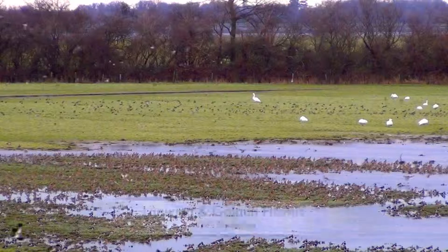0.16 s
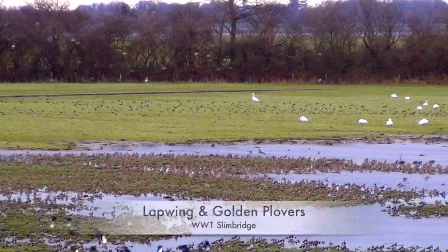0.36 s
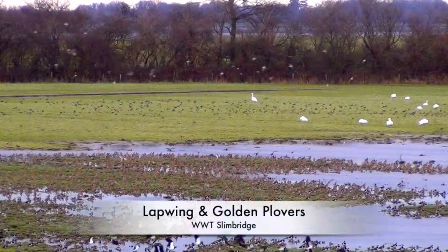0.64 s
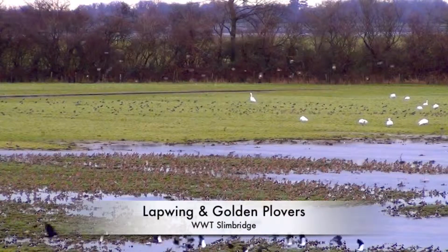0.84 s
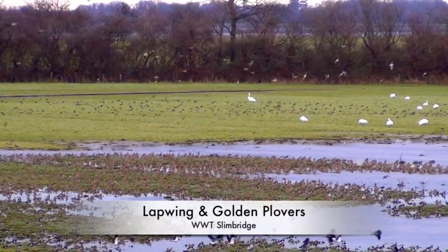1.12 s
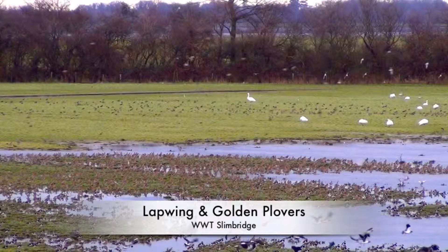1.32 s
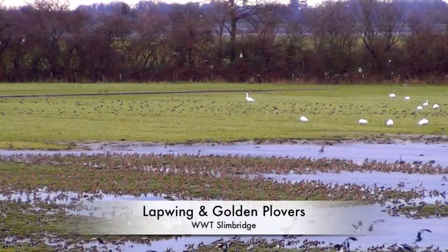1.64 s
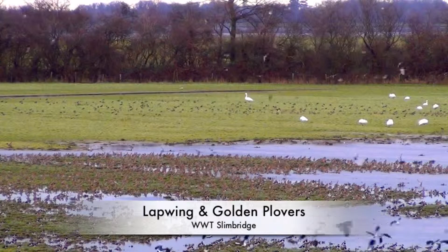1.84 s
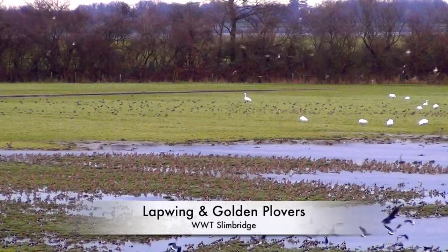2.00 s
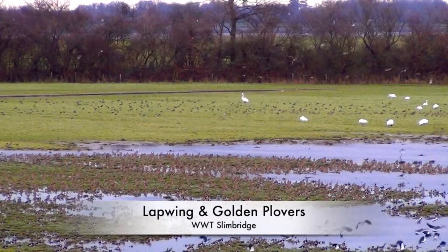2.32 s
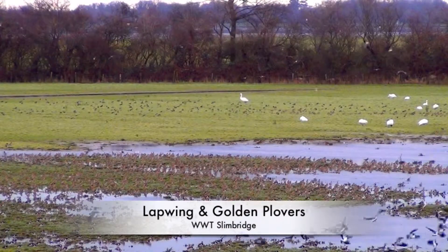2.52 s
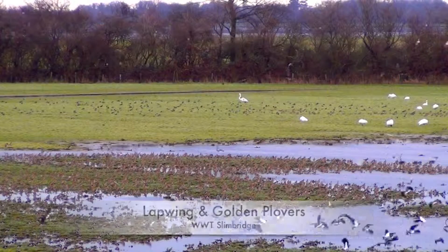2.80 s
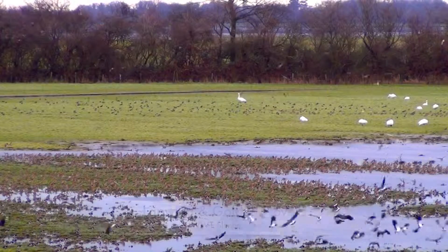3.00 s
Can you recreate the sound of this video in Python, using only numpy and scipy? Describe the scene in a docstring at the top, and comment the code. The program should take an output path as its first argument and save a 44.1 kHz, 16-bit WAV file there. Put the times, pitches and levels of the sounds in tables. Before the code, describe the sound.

Short arched waterbird yelps come at about 0.4, 0.9, 1.3, 1.5, 1.8 and 2.8 seconds, the fifth lower-pitched, the last strongest. The wetland background fades in quickly with hiss, faint hum, thin whine and rumble, while far birds whistle downward throughout. A faint scuff precedes the first yelp; soft bumps and thin distant mews follow from 0.5. A dull knock sounds near 2.3, then two weak bumps.

```python
"""An open wetland fades in together with its camera hiss, faint hum, thin high whine and low rumble.
Far birds whistle sagging sine notes throughout; a faint scuff (filtered noise) precedes the first yelp.
A waterbird gives six arched yelps, built from harmonics shaped by throat resonances.
During the first second soft bumps (brief low pulses) and two far mews (upper harmonics) join in.
Later a dull knock excites a set of damped modes, and two more bumps follow."""
import sys
import numpy as np
from scipy import signal
from scipy.fft import rfft, irfft, next_fast_len
from scipy.io import wavfile
from scipy.ndimage import uniform_filter1d, map_coordinates

SR = 44100
rng = np.random.default_rng(int(sys.argv[2]) if len(sys.argv) > 2 else 0)


def pcm_store(signal):
    """Save signal as 16-bit PCM."""
    levels = np.round(np.clip(np.atleast_2d(signal), -1, 1) * 32767)
    wavfile.write(sys.argv[1], SR, levels.astype(np.int16).T)


N = 138915
T = np.arange(N) / SR  # time in seconds


def amp(db):
    """Decibels to amplitude ratio: 20 dB is a factor of ten."""
    return 10 ** (np.asarray(db) / 20)


def unit(x):
    """Normalise to a root-mean-square of 1."""
    return x / np.sqrt(np.mean(x ** 2) + 1e-20)


def along(points, hz):
    """Interpolate (frequency, value) points linearly over log frequency."""
    f, v = np.transpose(points)
    return np.interp(np.log(hz + 1), np.log(f + 1), v)


def wobble(rate):
    """Smooth random modulation: a spline through random knots, rate knots a second."""
    return map_coordinates(rng.standard_normal(4096), [T * rate], mode="wrap")


def filtered(x, response):
    """Linear filtering: multiply the zero-padded spectrum by a response of frequency."""
    m = next_fast_len(N + SR // 4)
    hz = np.fft.rfftfreq(m, 1 / SR)
    return irfft(rfft(x, m) * response(hz), m)[..., :N]


def noise(spectrum):
    """Coloured noise: white noise shaped by a spectral envelope, rms 1."""
    white = rng.standard_normal(N)
    return unit(filtered(white, lambda hz: amp(along(spectrum, hz))))


def rush(spectrum, patchy_db):
    """Partly coherent stereo noise, rms 1, its gain patchy over time and frequency."""
    # Interaural coherence. Each row: frequency in Hz, likeness of left and right from 0 to 1.
    likeness = [(30, 1), (130, 1), (290, 1), (640, 0.9), (1410, 0.59), (3100, 1), (6800, 0.75), (15000, 1)]
    z = signal.stft(rng.standard_normal((2, N)), nperseg=512)[2]
    patches = uniform_filter1d(rng.standard_normal(z.shape[1:]), size=3, axis=0)
    patches = unit(uniform_filter1d(patches, size=12, axis=1))
    pair = signal.istft(z * amp(patchy_db * patches), nperseg=512)[1][:, :N]

    def mid_side_response(hz):
        # cos and sin of half this angle give mid and side noise the wanted coherence
        half_angle = np.arccos(np.clip(along(likeness, hz), -1, 1)) / 2
        return amp(along(spectrum, hz)) * [np.cos(half_angle), np.sin(half_angle)]

    mid, side = filtered(pair, mid_side_response)
    return unit(np.array([mid + side, mid - side]))


def tone(hz):
    """Frequency modulation: a sine of rms 1 whose phase is the running sum of its pitch."""
    return np.sqrt(2) * np.sin(2 * np.pi * np.cumsum(hz) / SR)


def swell(u):
    """Rounded envelope: root of a half sine as u goes from 0 to 1."""
    return np.sqrt(np.abs(np.sin(np.pi * u)))


def camera():
    """Broadband hiss, wavering hum tones and a whine whose amplitude modulation adds buzzing sidebands."""
    # Hiss common to both ears. Each row: frequency in Hz, relative density in dB per Hz.
    hiss_spectrum = [(100, 6), (3000, -16.5), (8000, 0.5), (15500, 2)]
    # Hiss in opposite phase at the two ears. Each row: frequency in Hz, relative density in dB per Hz.
    side_spectrum = [(100, 3), (4500, 2.5), (7000, -7.5), (9500, -19), (15000, -49)]
    # Hum tones. Each row: centre pitch in Hz, level in dB.
    hum_tones = [(205, -69.5), (640, -73.5), (883, -78.5)]
    hiss_db, side_db, whine_db = -63, -70.5, -77.5
    whine_hz, buzz_hz = 15625, 49
    buzz_db, buzz_slope_db = -8, 2  # first sideband relative to the whine; rise per buzz harmonic

    hum = sum(amp(db) * tone(hz + 4 * wobble(20)) for hz, db in hum_tones)
    buzz = sum(2 * amp(buzz_db + buzz_slope_db * k) * np.cos(2 * np.pi * (k + 1) * buzz_hz * T)
               for k in range(3))
    whine = amp(whine_db) * (1 + buzz) * tone(np.full(N, whine_hz))
    hiss = amp(hiss_db) * noise(hiss_spectrum)
    hiss = hiss + amp(side_db) * noise(side_spectrum) * [[1], [-1]]
    return hiss + hum + whine


def air():
    """Slowly modulated low noise for the rumble; coloured noise for the far flock's blurred murmur."""
    # Course of the rumble, used relative to its median. Each row: time in seconds, level in dB.
    rumble_course = [(.2, -56), (.5, -46), (.7, -51.5), (1, -53.5), (1.4, -58), (1.8, -57), (2.1, -55.5),
                     (2.38, -54), (2.65, -53), (2.85, -55.5), (3.15, -58.5)]
    # Rumble spectrum. Each row: frequency in Hz, relative density in dB per Hz.
    rumble_spectrum = [(12, -29), (24, -5), (43, 1.5), (85, -2), (150, -2), (290, -8), (400, -17.5),
                       (650, -20.5), (1100, -55)]
    # Far flock and air. Each row: frequency in Hz, relative density in dB per Hz.
    field_spectrum = [(150, -6), (350, -0.5), (650, -3), (1050, -5), (1350, -3), (1700, -8), (2150, -5.5),
                      (2500, -10.5), (2900, -16), (4500, -17.5), (7000, -21), (15000, -56)]
    rumble_db, rumble_follows = -55, 0.75  # level at the median; share of the course that is followed
    field_db, fade_db_per_s = -56.5, 0.5  # level at mid-scene; steady decline

    course_db = np.interp(T, *np.transpose(rumble_course))
    rumble_gain = amp(rumble_db + rumble_follows * (course_db - np.median(course_db)))
    rumble = rumble_gain * rush(rumble_spectrum, patchy_db=1.5)
    field_gain = amp(field_db - fade_db_per_s * (T - T.mean()) + 1.3 * wobble(5.1))
    return rumble + field_gain * rush(field_spectrum, patchy_db=1.97)


def whistles(count=36):
    """Near-pure tones gliding down: single far birds, and a flock of fainter notes at random."""
    # Single whistles. Each row: start in seconds, length in seconds, starting pitch in Hz, level in dB.
    single = [(0.141, .18, 2474, -62.5), (.55, 0.15, 2490, -66), (0.679, .14, 2090, -63.5),
              (0.745, 0.096, 2405, -65), (0.877, 0.048, 1270, -62.5), (0.967, .09, 2086, -65),
              (1.42, 0.19, 2520, -67), (1.455, 0.048, 1342, -61), (2.17, 0.087, 2187, -67),
              (2.284, 0.12, 2580, -69), (2.74, 0.2, 2600, -67)]
    sag_per_s, jitter_scale = 0.27, 0.0049  # fractions of the starting pitch
    flock_hz, flock_spread = 2300, 0.09  # centre pitch; largest fractional departure
    flock_length_s, flock_db = 0.11, -70  # mean length; level

    out = np.zeros(N)
    jitter, flutter_db = jitter_scale * wobble(250), 1.6 * wobble(60)
    flock = []
    for k, (a, b, c) in enumerate(rng.random((count, 3))):
        start = T[-1] * (k + a) / count  # one note in each equal slot of time
        pitch = flock_hz * (1 + flock_spread * (2 * c - 1))
        flock.append((start, flock_length_s * (0.5 + b), pitch, flock_db))
    for s, length, hz, db in list(single) + flock:
        at = (T > s) & (T < s + length)
        t = T[at] - s
        note = tone(hz * (1 - sag_per_s * t + jitter[at]))
        out[at] += amp(db + flutter_db[at]) * swell(t / length) * note
    return out


def knocks():
    """Modal excitation: an impulse, decaying noise through damped resonances, and a noise scuff."""
    # Strokes: a faint scuff, then a dull knock.
    # Each row: time in seconds, body level in dB, scuff level in dB.
    strokes = [(0.238, -68, -58), (2.257, -44.5, -62)]
    # Body modes. Each row: centre in Hz, bandwidth in Hz, relative level in dB.
    modes = [(415, 80, -4), (540, 60, 0), (613, 34, 4.5), (883, 76, -4.5), (1310, 79, -5), (1770, 130, -12),
             (2400, 810, -16)]
    # Scuff spectrum. Each row: frequency in Hz, relative density in dB per Hz.
    scuff_spectrum = [(800, -3), (2600, 4), (5500, -10), (13000, -15)]
    ring_t60, scuff_t60, attack_s = 0.31, 0.21, 0.00095  # seconds to decay by 60 dB; onset time constant
    blow_db = 2.5  # peak of the first contact above the body level

    def body(f):
        # neighbouring modes alternate in sign
        return sum((-1) ** k * amp(db) * 1j * f * w / (c * c - f * f + 1j * f * w)
                   for k, (c, w, db) in enumerate(modes))

    ring = unit(filtered(rng.standard_normal(N), body))
    scuff = unit(noise(scuff_spectrum) * amp(4.9 * wobble(350)))
    out = np.zeros(N)
    for s, body_db, scuff_db in strokes:
        t = np.maximum(T - s, 0)
        impulse = 1.0 * (np.arange(N) == round(s * SR))
        blow = filtered(impulse, body)
        out += amp(body_db + blow_db) * blow / np.abs(blow).max()
        decaying = ring * amp(body_db - 60 * t / ring_t60) + scuff * amp(scuff_db - 60 * t / scuff_t60)
        out += (1 - np.exp(-t / attack_s)) * decaying
    return out


def yelps():
    """Source and filter: arched harmonics sweep through throat resonances, with an upward register break."""
    # Yelps. Each row: time of the top in seconds, top pitch in Hz, rise in seconds, fall in seconds,
    # onset of full voice in seconds before the top, register break in seconds before the top,
    # its step in log pitch, relative level in dB, left over right in dB.
    calls = [(0.365, 2190, 0.032, 0.022, 0.024, 0.014, 0.12, -44, -2.5),
             (0.856, 2193, 0.027, 0.028, 0.029, 0.018, 0.11, -49.5, -2),
             (1.31, 1880, 0.033, 0.018, .030, 0.0116, 0.135, -51.5, -2.5),
             (1.540, 2152, .029, .025, .028, 0.0088, .15, -40.5, -2),
             (1.822, 1508, 0.028, 0.026, 0.01, 0.0167, 0.236, -42, -1),
             (2.8369, 2043, 0.026, 0.021, 0.026, 0.0116, 0.092, -38.5, -2.5)]
    # Voice source. Each row: harmonic number, relative level in dB.
    overtones = [(1, -2), (2, -14), (3, -35), (4, -29)]
    # Throat resonances. Each row: frequency in Hz, gain in dB.
    throat = [(600, -13), (1100, -14), (1330, 0.5), (1500, -1), (1800, -3.5), (2150, 0.5), (2600, -3),
              (3400, -14), (4200, -4), (5200, -15), (9000, -24.5)]
    arch_drop, arch_power = 0.41, 2.6  # log pitch drop before soft limiting; flatness of the top
    break_s, break_reach_s = 0.00041, 0.01574  # speed of the jump; reach of the low register before it
    edge_s, full_until = 0.0012, 1.02  # speed of full voice's edges; its end in fall lengths
    skirt_db, width = -14, 1.5  # fundamental outside full voice; call's reach in rise or fall lengths
    bounce_s, bounce_db = 0.012, -16  # one early reflection

    def after(t, edge):
        return (1 + np.tanh(t / edge)) / 2  # smooth step from 0 to 1

    out = np.zeros((2, N))
    jitter, shimmer_db = 0.0084 * wobble(500), -1.37 * wobble(300)
    rasp = amp(-22.5) * noise(throat)
    for s, top_hz, rise, fall, lead_s, break_lead_s, step, db, pan_db in calls:
        at = (T > s - 2 * rise) & (T < s + 2 * fall)
        t = T[at] - s
        u = t / np.where(t < 0, rise, fall)
        low_register = after(-t - break_lead_s, break_s)
        low_register = low_register * np.exp(-((t + break_lead_s) / break_reach_s) ** 2)
        arch = np.tanh(arch_drop * np.abs(u) ** arch_power)
        hz = top_hz * np.exp(jitter[at] - arch - step * low_register)
        first, *upper = [amp(level + along(throat, round(k) * hz)) * tone(round(k) * hz)
                         for k, level in overtones]
        full = after(t + lead_s, edge_s) * after(full_until * fall - t, edge_s)
        voice = amp(skirt_db * (1 - full)) * first + sum(upper) + rasp[at]
        envelope = amp(db + shimmer_db[at]) * np.exp(-np.abs(u / width) ** 6)
        out[:, at] += envelope * voice * amp([[pan_db / 2], [-pan_db / 2]])
    bounce = filtered(out, lambda hz: np.exp(-2j * np.pi * hz * bounce_s))  # linear phase is a pure delay
    return out + amp(bounce_db) * bounce


def bumps():
    """Gaussian-windowed low cosines push the microphone, with a phase difference between the ears."""
    # Bumps. Each row: time in seconds, peak in dB, pitch in Hz.
    pulses = [(.513, -30, 85.5), (.578, -26.5, 104), (0.629, -36.5, 79), (0.673, -36.5, 59.7),
              (0.697, -36, 67), (0.774, -43, 59.5), (0.843, -40, 113), (0.891, -43.5, 63.6),
              (2.36, -45, 48.4), (2.529, -42.5, 85)]
    cycles, phase = 0.53, 0.47  # window scale in cycles; radians by which the left ear leads
    lead = np.array([[phase], [-phase]]) / 2
    return sum(amp(db) * np.exp(-((T - s) * hz / cycles) ** 2) * np.cos(2 * np.pi * hz * (T - s) + lead)
               for s, db, hz in pulses)


def mews():
    """Additive synthesis: far, thin, gently arched cries from harmonics three to five alone."""
    # Mews. Each row: start in seconds, length in seconds, top pitch of the fundamental in Hz,
    # then the levels of the 3rd, 4th and 5th harmonic in dB.
    cries = [(0.531, 0.16, 1110, -73, -69, -82), (0.732, .5, 1170, -73.5, -75, -76.5)]
    sag, fading_db = 0.12, 2.8  # fraction of pitch lost at the ends; scale of the random fading

    out, jitter = np.zeros(N), 0.005 * wobble(120)
    for s, length, top_hz, *levels_db in cries:
        at = (T > s) & (T < s + length)
        u = (T[at] - s) / length
        hz = top_hz * (1 + jitter[at] - sag * np.abs(2 * (u - 0.5)) ** 1.6)
        for k, db in enumerate(levels_db, start=3):
            gain = amp(db + fading_db * wobble(22)[at])
            out[at] += gain * swell(u) * tone(k * hz)
    return out


def echo(x):
    """Diffuse reverberation: convolution with exponentially decaying noise, independent in each ear."""
    t60 = 0.24  # seconds to decay by 60 dB
    tail = rng.standard_normal((2, SR // 2)) * amp(-60 * T[:SR // 2] / t60)
    return signal.fftconvolve(x, tail / np.linalg.norm(tail[0]), axes=1)[:, :N]


def scene():
    """Superposition: birds and knocks with their echo, over bumps, air and camera noise."""
    echo_db = -14.5
    sounds = whistles() + knocks() + yelps() + mews()
    return sounds + amp(echo_db) * echo(sounds) + bumps() + air() + camera()


def record(dry):
    """Linear fade-in, then an ideal low-pass filter as the band limit."""
    # Start and end of the fade, in seconds.
    fade_in = (.12, 0.19)
    top_hz = 15760
    return filtered(dry * np.interp(T, fade_in, (0, 1)), lambda hz: hz < top_hz)


dry = scene()
out = record(dry)
pcm_store(out)
```